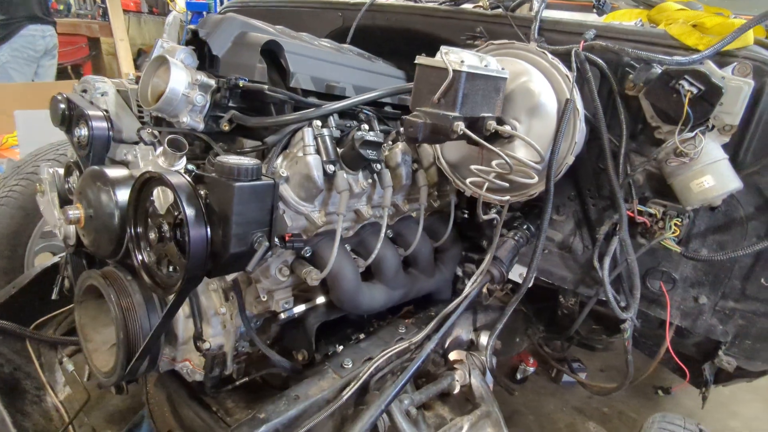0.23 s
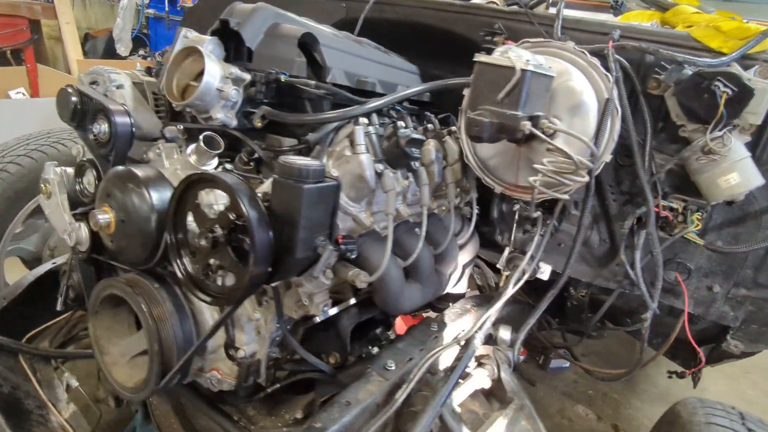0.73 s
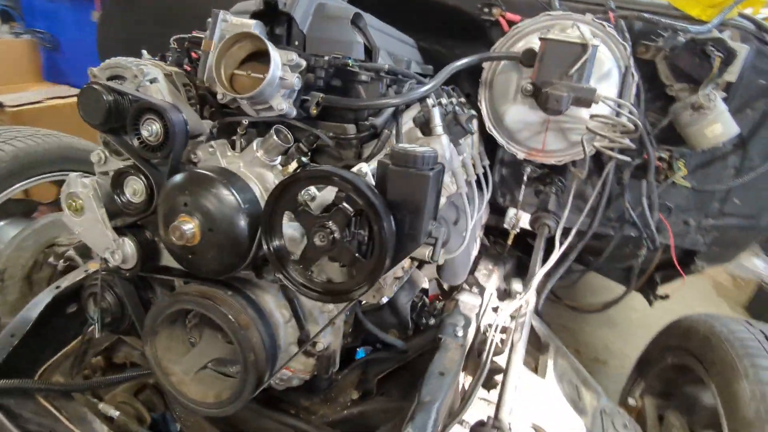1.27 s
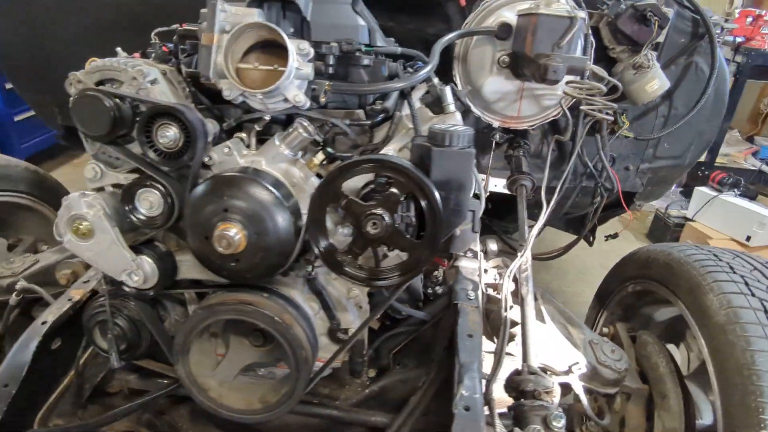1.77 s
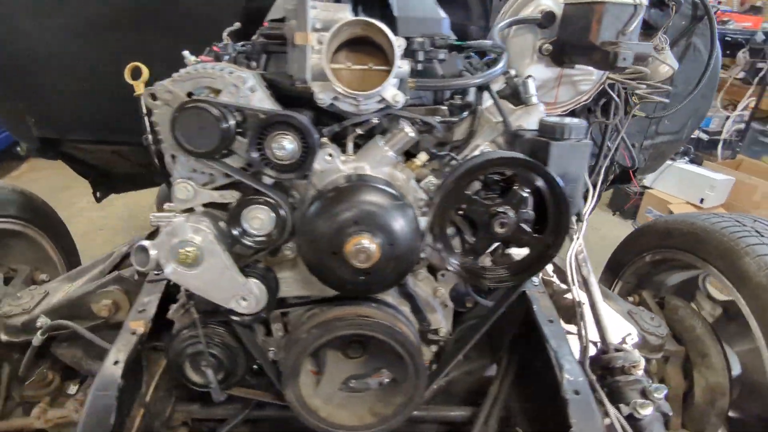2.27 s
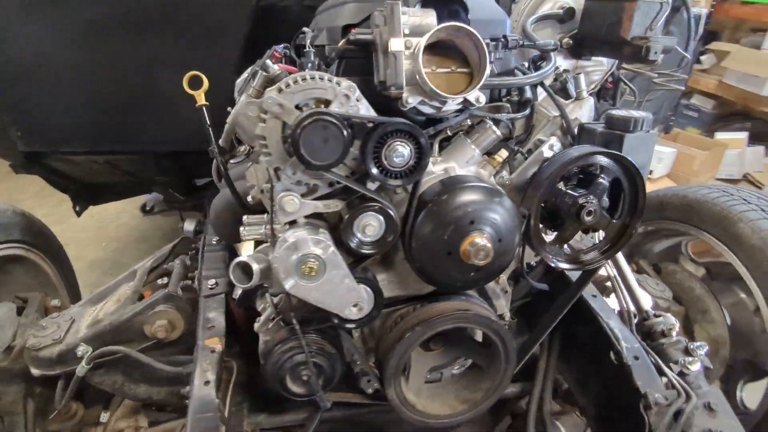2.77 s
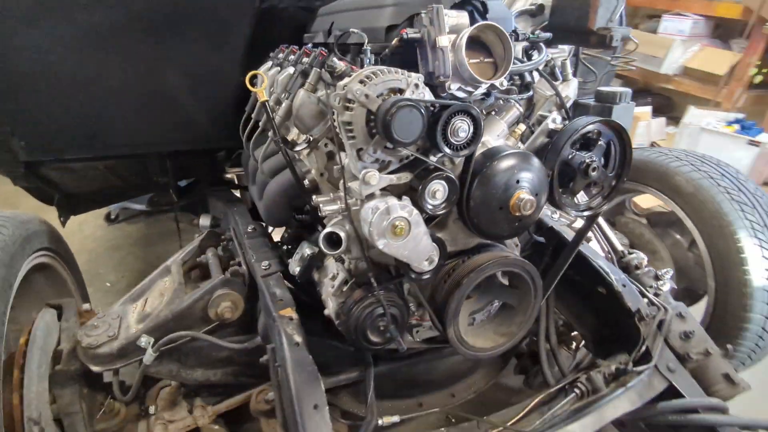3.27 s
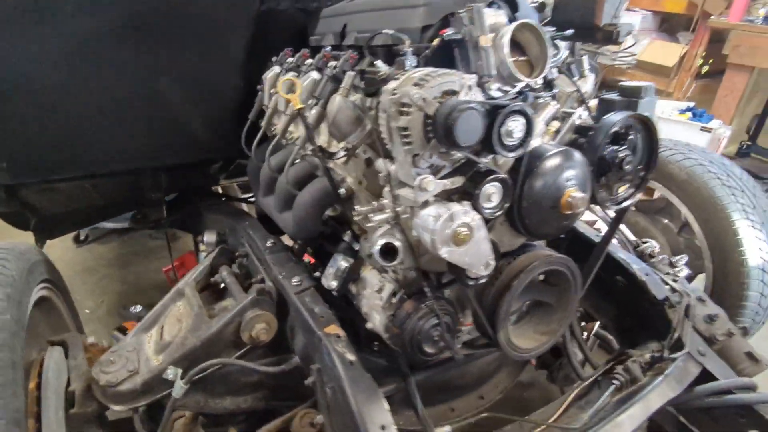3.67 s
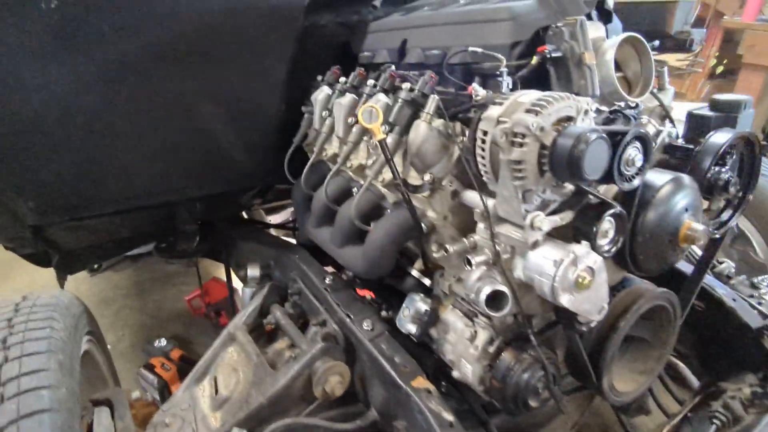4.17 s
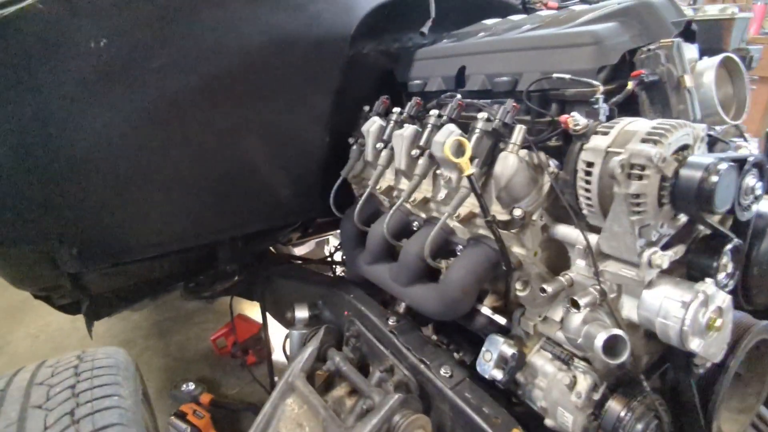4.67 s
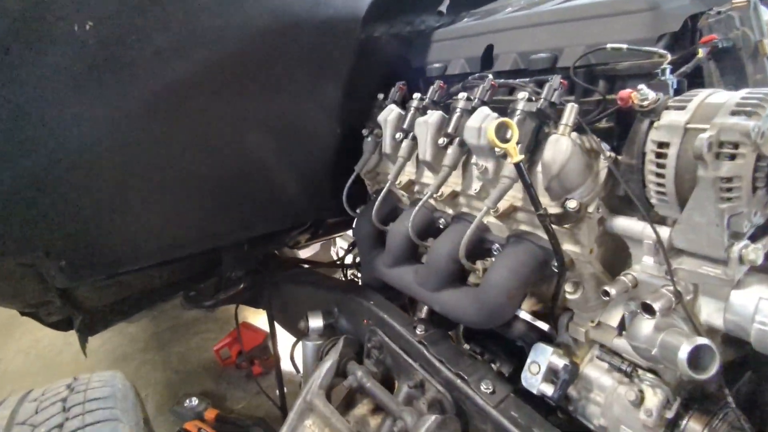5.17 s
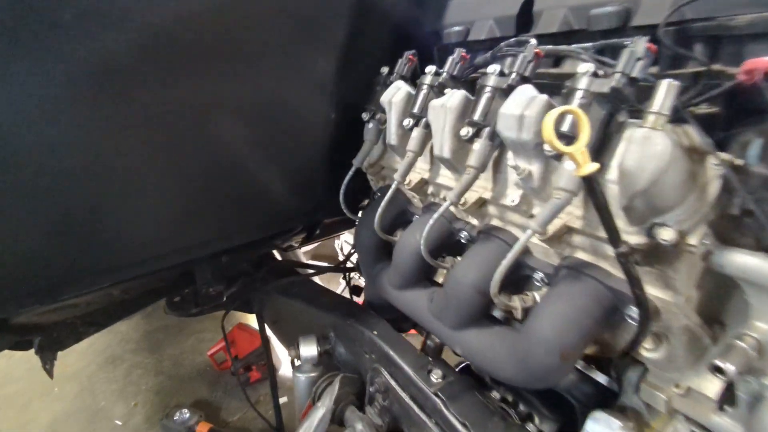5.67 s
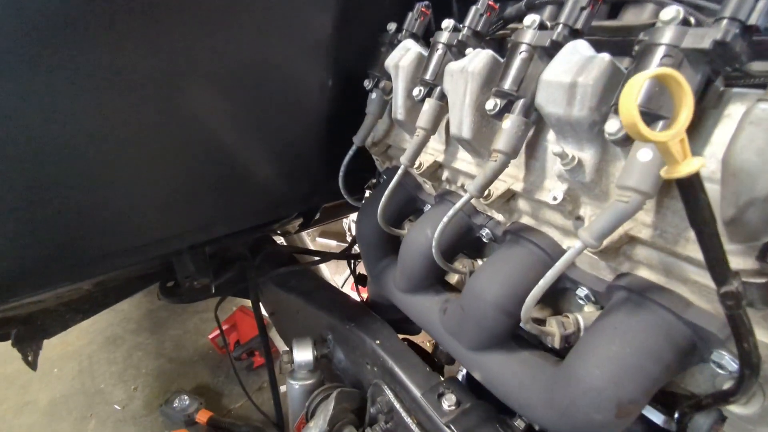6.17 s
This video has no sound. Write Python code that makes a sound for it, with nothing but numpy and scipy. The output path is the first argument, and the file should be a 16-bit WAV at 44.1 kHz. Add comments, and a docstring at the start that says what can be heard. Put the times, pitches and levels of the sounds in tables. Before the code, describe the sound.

Continuous bass hum and soft ventilation noise in a small indoor garage, heard from a moving handheld microphone. The hum grows stronger as the listener walks and beats slowly. Underfoot, quiet shuffles and tiny crackles give way to one abrupt hissing scrape, hollow knocks, then a rough sliding drag across concrete. Afterwards come light taps and brittle grit clicks, before the footwork fades and only hum and fan remain.

```python
"""A motor's hum throbs in a workshop, over the low boom and soft rush of a fan.
The hum is a sum of pure tones, two of them 2.45 Hz apart; the fan is three layers of coloured noise.
The balance of the tones shifts as a listener walks through the room's standing waves.
Grit ticks underfoot: short cracks of noise and knocks. Shoe soles slide on gritty concrete:
noise swells through moving resonances. The footwork echoes briefly in the room."""
import sys
import numpy as np
from scipy import signal
from scipy.fft import rfft, irfft, next_fast_len
from scipy.io import wavfile
from scipy.ndimage import uniform_filter1d, map_coordinates

SR = 44100
rng = np.random.default_rng(int(sys.argv[2]) if len(sys.argv) > 2 else 0)


def unload_audio(sound):
    """Save the sound as a 16-bit wav file, at the path given as the first command line argument."""
    columns = np.transpose(np.atleast_2d(sound))
    # keep every value between -1 and 1, then stretch to whole-number steps
    steps = np.round(np.clip(columns, -1, 1) * 32767)
    wavfile.write(sys.argv[1], SR, steps.astype(np.int16))


def volts(x):
    """Linear amplitude factor 10**(x/20) for a level x in dB, scalar or array-like."""
    e = np.asarray(x, float) / 20
    return 10 ** e


N = 282681  # length in samples


def unit(x):
    """Scale to rms 1."""
    return x / np.sqrt(np.mean(x ** 2) + 1e-20)


def along(points, hz):
    """Read a curve of (f/Hz, value) points, with frequency on a log axis."""
    f, value = np.transpose(points)
    return np.interp(np.log(hz + 1), np.log(f + 1), value)


def curves(rows):
    """One value per sample for each column after the time."""
    s, *columns = np.transpose(rows)
    t = np.arange(N) / SR
    return np.array([np.interp(t, s, column) for column in columns])


def wobble(rate):
    """A smooth random curve through `rate` random knots a second."""
    knots = rng.standard_normal(int(N * rate / SR) + 4)
    return map_coordinates(knots, [np.arange(N) * rate / SR])


def filtered(x, response):
    """Multiply the spectrum of x by a response, a function of frequency."""
    size = next_fast_len(x.shape[-1] + 8192)
    hz = np.fft.rfftfreq(size, 1 / SR)
    return irfft(rfft(x, size) * response(hz), size)[..., :x.shape[-1]]


def colour(spectrum):
    """Gain of a (f/Hz, level/dB) spectrum."""
    return lambda hz: volts(along(spectrum, hz))


def noise(gain, alike):
    """Stereo noise, rms 1 in the middle, with a colour and a left-right likeness by frequency."""
    def middle_and_side(hz):
        turn = np.arccos(np.clip(along(alike, hz), -1, 1)) / 2
        return gain(hz) * [np.cos(turn), np.sin(turn)]

    mid, side = filtered(rng.standard_normal((2, N)), middle_and_side)
    return np.array([mid + side, mid - side]) / np.std(mid)


# Motor tones: shaft turn, twice the shaft, twice the mains, three side tones: f/Hz
MOTOR_HZ = [58.8, 117.55, 120.0, 89.8, 176.4, 178.8]
# Loudness of each motor tone: level/dB at the start of the walk, level/dB at walked share 1 (rms)
MOTOR_DB = [(-48.5, -45), (-51, -39.5), (-61.5, -46.5), (-55, -57.5), (-60, -72.5), (-73, -57.5)]
# Weak steady tones: f/Hz, level/dB (rms)
STEADY_TONES = [(41.2, -65.5), (44.9, -60.5), (102.6, -73), (240, -67.5), (294, -73.5), (389, -69.5),
                (415, -75), (470.3, -68.5), (490, -72)]
# Progress through the standing waves: t/s, share of their change walked through (about 0 to 1)
WALK_PROGRESS = [(0, 0.08), (.9, 0), (2.4, 0.47), (3.2, 0.77), (4.8, 0.96), (6.41, 1.03)]


def motor():
    """Clean tones; twice the shaft and twice the mains lie 2.45 Hz apart, so the hum throbs."""
    in_step_s = 4.103  # all tones peak together here: a crest of the throb
    t = np.arange(N) / SR - in_step_s
    walked, = curves(WALK_PROGRESS)
    tones = list(STEADY_TONES)
    for hz, (start_db, end_db) in zip(MOTOR_HZ, MOTOR_DB):
        tones.append((hz, start_db + (end_db - start_db) * walked))

    def hum(lag_s):
        return sum(np.sqrt(2) * volts(db) * np.cos(2 * np.pi * hz * (t - lag_s)) for hz, db in tones)

    return np.array([hum(-0.000026), hum(0.00022)])  # the hum reaches the left a little sooner


# Mean loudness of the fan, before gusts: t/s, rumble level/dB, rush level/dB
FAN_LEVELS = [(0, -49.5, -58), (1.5, -52.5, -58.5), (2.2, -50.5, -59), (3.3, -51.5, -59), (3.7, -51, -58),
              (4.6, -53, -58), (5, -53, -59.5), (5.7, -53, -59.5), (6.41, -55.5, -61.5)]
# Brief swells of the boom: t/s, added level/dB
BOOM_SWELLS = [(0.131, 18.5), (1.07, 9.5), (1.7, 12.5), (2.08, 11), (2.35, 12), (2.85, 11.5), (4.85, 10)]
# Low room resonance, relative spectrum: f/Hz, level/dB per Hz
BOOM_COLOUR = [(60, -39), (80, -6), (100, -2.5), (140, -4), (165, -13.5), (220, -53.5), (400, -120)]
# Fan rumble, relative spectrum: f/Hz, level/dB per Hz
RUMBLE_COLOUR = [(28, -40.5), (38, -3), (70, 0.5), (100, -5.5), (140, -4), (200, -5), (350, -9.5),
                 (600, -26.5), (1000, -32), (2000, -120)]
# Fan rush, relative spectrum: f/Hz, level/dB per Hz
RUSH_COLOUR = [(240, -31.5), (450, -6.5), (700, -7), (1000, -10), (1400, -13), (2100, -13), (2700, -23.5),
               (3500, -29.5), (4500, -39.5), (5500, -43), (6800, -48.5), (9000, -55.5), (15500, -61)]
# How alike the fan sounds left and right: f/Hz, likeness (0 to 1)
FAN_LIKENESS = [(60, 0.75), (150, 0.9), (380, 0.92), (700, 0.55), (1400, 0.27), (3000, 0.14), (15000, .05)]


def fan():
    """A gusty rumble and room boom under a smooth, dull rush."""
    rumble_db, rush_db = curves(FAN_LEVELS)
    walked, = curves(WALK_PROGRESS)
    t = np.arange(N) / SR
    swell_db = sum(db * np.exp(-((t - s) / 0.031) ** 2) for s, db in BOOM_SWELLS)
    boom_db = -53 - walked + swell_db  # the boom thins by about 1 dB along the walk
    boom = volts(boom_db + 1.8 * wobble(5.9)) * noise(colour(BOOM_COLOUR), FAN_LIKENESS)
    rumble = volts(rumble_db + 1.2 * wobble(6)) * noise(colour(RUMBLE_COLOUR), FAN_LIKENESS)
    rush = volts(rush_db + 0.8 * wobble(12)) * noise(colour(RUSH_COLOUR), FAN_LIKENESS)
    left, right = boom + rumble + rush
    return np.array([left, np.roll(right, round(0.00024 * SR))])  # the fan stands to the left


# Grit ticks: t/s, crack level/dB, knock peak level/dB before panning, knock f/Hz
GRIT_TICKS = [(0.29, -76, -60, 934), (0.9925, -77.5, -68, 848), (2.201, -66, -57, 1330),
              (2.4284, -66, -67, 945), (2.59, -65, -68, 735), (2.9565, -74, -61, 875),
              (3.035, -62.5, -55, 1160), (3.8375, -69, -49, 713), (4.03, -76, -51, 1030),
              (4.036, -60, -40, 1740), (4.3687, -57, -37.5, 1560), (5.112, -79, -35.5, 1310),
              (5.4174, -61, -40, 961), (5.4215, -59.5, -45, 842), (5.504, -51, -65, 902),
              (5.639, -76.5, -68.5, 729)]
# A small hard chip rings: t/s, starting level/dB, f/Hz
CHIP_RINGS = [(5.421, -50, 5000), (5.4267, -50.5, 5080), (5.503, -55, 5600)]
# Hiss of grit, relative spectrum: f/Hz, level/dB per Hz
GRIT_COLOUR = [(2650, -20.5), (4500, -2), (5260, 0), (5930, -5.5), (6580, 2.5), (7150, -3), (8620, -0.5),
               (9870, -5), (11700, 2.5), (13600, -1.5), (15200, -5), (15600, -22)]
# Where the working foot is: t/s, left minus right level/dB
FOOT_PAN = [(0, -2), (1.2, -3), (3.9, -3.5), (4.02, -12.5), (4.18, -8.5), (4.3, -3), (4.38, 7.5),
            (4.45, -2), (5.1, -1.5), (5.5, -3), (6.41, -1.5)]


def ticks():
    """Each grain cracks with a puff of hiss and knocks the sole for a cycle or two; a few chips ring."""
    hiss, knock = np.zeros((2, N + SR)), np.zeros((2, N + SR))
    t = np.arange(SR // 4) / SR
    crack_t60_s, puff_t60_s, ring_t60_s = 0.0045, 0.086, 0.023  # times to fall by 60 dB
    for s, crack_db, knock_db, hz in GRIT_TICKS:
        pan_db = np.interp(s, *np.transpose(FOOT_PAN))
        sides = volts([[pan_db / 2], [-pan_db / 2]])
        at = slice(round(s * SR), round(s * SR) + len(t))
        burst = volts(-60 * t / crack_t60_s) + 0.2 * volts(-60 * t / puff_t60_s)
        hiss[:, at] += volts(crack_db) * sides * burst
        cycles = hz * t
        blow = cycles * volts(-60 * cycles / 4.9) * np.sin(2 * np.pi * cycles)
        knock[:, at] += volts(knock_db) * sides * blow / np.abs(blow).max()
    for s, db, hz in CHIP_RINGS:
        at = slice(round(s * SR), round(s * SR) + len(t))
        knock[:, at] += volts(db - 60 * t / ring_t60_s) * np.sin(2 * np.pi * hz * t)
    return hiss[:, :N] * noise(colour(GRIT_COLOUR), [(1000, 0.2)]) + knock[:, :N]


# How long the room rings: f/Hz, time to fall by 60 dB t/s
ROOM_T60 = [(500, 0.17), (2000, 0.47), (10000, .2)]


def room(x):
    """Each frequency of the room's answer dies at its own speed."""
    hz, t, z = signal.stft(rng.standard_normal((2, SR // 2)), SR, nperseg=256)
    fade = volts(-60 * t / along(ROOM_T60, hz)[:, None])
    tail = signal.istft(z * fade, SR, nperseg=256)[1]
    return signal.fftconvolve(x, tail / np.linalg.norm(tail[0]), axes=1)[:, :N]


def resonant(x, centre_hz, sharp, skirt_db, patchy_db):
    """Pass x through one resonance whose centre moves, keeping the rms about the same."""
    hz, t, z = signal.stft(x, SR, nperseg=256)
    centre = np.interp(t, np.arange(N) / SR, centre_hz)
    before = np.abs(z).mean((0, 2))[:, None]
    gain = volts(skirt_db) + 1 / (1 + (sharp * np.log((hz[:, None] + 1) / centre)) ** 2)
    patches = rng.standard_normal(gain.shape)
    patches = uniform_filter1d(uniform_filter1d(patches, size=2, axis=0), size=5, axis=1)
    gain = gain * volts(patchy_db * unit(patches))  # rough ground rings unevenly
    gain = gain * np.linalg.norm(before) / np.linalg.norm(gain * before, axis=0)
    return signal.istft(z * gain, SR, nperseg=256)[1][:, :N]


# Sole strokes: peak t/s, rise t/s, fall t/s, then peak level/dB of grit hiss, sole body, scrape
SOLE_STROKES = [(1.073, 0.17, 0.39, -80.5, -59.5, -73.5), (1.125, .03, .1, -80, -67, -77),
                (1.225, 0.056, .12, -75.5, -61, -68.5), (1.915, 0.042, 0.4, -82, -65, -81),
                (2.2, .2, .1, -81.5, -62.5, -75), (2.26, .1, .1, -77, -60, -75),
                (2.324, 0.13, 0.27, -75, -61.5, -66.5), (2.593, 0.01, 0.064, -64.5, -66, -69.5),
                (3.046, .25, .25, -85.5, -71, -74), (3.227, 0.14, 0.15, -65, -58.5, -61.5),
                (3.325, .03, .05, -80, -70, -72), (3.617, 0.035, 0.12, -45.5, -39.5, -47.5),
                (3.76, .2, 0.35, -80, -62.5, -68), (3.845, .04, 0.056, -75, -62.5, -70),
                (4.036, 0.02, 0.027, -80, -53.5, -60), (4.11, 0.044, 0.11, -87, -60.5, -62),
                (4.17, 0.1, 0.015, -81, -60, -59), (4.204, .02, 0.049, -78, -59.5, -71.5),
                (4.305, .02, 0.096, -76.5, -57, -67.5), (4.378, .012, 0.077, -64, -59.5, -61),
                (4.412, 0.065, 0.028, -63, -59.5, -55.5), (4.88, 0.26, .4, -89, -70, -75.5),
                (5.065, .08, 0.22, -80, -57.5, -70.5), (5.135, 0.08, 0.084, -80, -52, -66.5),
                (5.3, .5, .5, -86, -74.5, -77), (5.425, 0.0088, 0.073, -64.5, -54, -58.5),
                (5.512, 0.082, 0.064, -67, -59.5, -71), (5.6, 0.34, .3, -81.5, -72.5, -73.5),
                (6.237, .035, 0.11, -82.5, -71.5, -72.5)]
# One long drag: t/s, grit hiss level/dB, sole body level/dB, scrape level/dB, scrape f/Hz
LONG_DRAG = [(4.43, -110, -90, -89.5, 3400), (4.445, -88.5, -65.5, -74.5, 3400),
             (4.487, -49, -43.5, -47.5, 3700), (4.567, -51.5, -44, -54, 2650),
             (4.651, -49.5, -50.5, -56, 3030), (4.713, -60.5, -63, -65, 2610),
             (4.777, -84.5, -75, -71, 2520), (4.9, -110, -90, -91, 2430)]


def footwork():
    """Levels in dB of grit, body and scrape: every stroke rises to its peak and falls; powers add."""
    t = np.arange(N) / SR
    # dB between a stroke's peak and one rise or fall time away: grit, body, scrape
    swing_db = 31.5 * np.array([1, 0.93, 0.77])
    rise_power, fall_power = 1.78, 1.12  # these round the peak
    dragging = (t > LONG_DRAG[0][0]) * (t < LONG_DRAG[-1][0])
    power = volts(curves(LONG_DRAG)[:3]) ** 2 * dragging + 1e-14
    for s, rise, fall, *peak_db in SOLE_STROKES:
        rising = abs((t - s) / rise) ** rise_power
        falling = abs((t - s) / fall) ** fall_power
        away = np.where(t < s, rising, falling)
        stroke_db = np.c_[peak_db] - np.outer(swing_db, away)
        power = power + volts(2 * stroke_db)  # doubled dB turns amplitude into power
    return 10 * np.log10(power)


# Body of the sole, relative spectrum: f/Hz, level/dB per Hz
SOLE_COLOUR = [(250, -58), (600, -0.5), (800, 1.5), (2200, -2.5), (2800, -19.5), (5000, -56)]
# Scrape, relative spectrum: f/Hz, level/dB per Hz
SCRAPE_COLOUR = [(1200, -58), (2100, 2), (4000, 1.5), (6000, -6.5), (8000, -38.5), (12000, -89)]
# A harder scrape stiffens the sole: scrape level/dB, body f/Hz
SOLE_STIFFNESS = [(-76.5, 1040), (-68, 1500), (-44.5, 1490)]


def slides():
    """Stick-slip makes the sole lumpy; its resonances shift as the foot presses; grit hisses evenly."""
    grit_db, sole_db, scrape_db = footwork()
    pan_db, = curves(FOOT_PAN)
    sole_hz = np.interp(scrape_db, *np.transpose(SOLE_STIFFNESS))
    before_drag = np.arange(N) / SR < LONG_DRAG[0][0]
    scrape_hz = np.where(before_drag, 2430, curves(LONG_DRAG)[3])  # the last drag pitch holds on
    slip = wobble(220)  # shared by all three layers
    sole = unit(volts(1.7 * slip)) * noise(colour(SOLE_COLOUR), [(1000, 0.34)])
    scrape = unit(volts(1.1 * slip + 0.97 * wobble(250))) * noise(colour(SCRAPE_COLOUR), [(1000, 0.29)])
    grit = unit(volts(0.49 * slip + 0.89 * wobble(600))) * noise(colour(GRIT_COLOUR), [(1000, 0.02)])
    grit = volts(grit_db) * grit
    dull = np.clip((-66.5 - grit_db) / 22, 0, 0.8)  # light strokes lose their top
    soft_grit = filtered(grit, lambda hz: 1 / (1 + (hz / 7500) ** 4))
    grit = (1 - dull) * grit + 2.0 * dull * soft_grit
    sole = volts(sole_db) * resonant(sole, sole_hz, sharp=3.0, skirt_db=-10.5, patchy_db=3)
    scrape = volts(scrape_db) * resonant(scrape, scrape_hz, sharp=4.3, skirt_db=-14, patchy_db=2.0)
    sides = volts([pan_db / 2, -pan_db / 2])
    return sole * sides ** 0.44 + (scrape + grit) * sides  # the duller body spreads wider


def scene():
    """Hum, fan and footwork, with the room answering the footwork."""
    feet = slides() + ticks()
    return motor() + fan() + feet + volts(-14.5) * room(feet)


def roll_off(x):
    """The treble ends steeply here."""
    return signal.sosfilt(signal.butter(12, 15750, fs=SR, output="sos"), x)


def record(dry):
    """Cut everything from 15750 Hz up and finish the mix."""
    mix = filtered(dry, lambda hz: hz < 15750)
    return roll_off(mix)


dry = scene()
out = record(dry)
unload_audio(out)
```